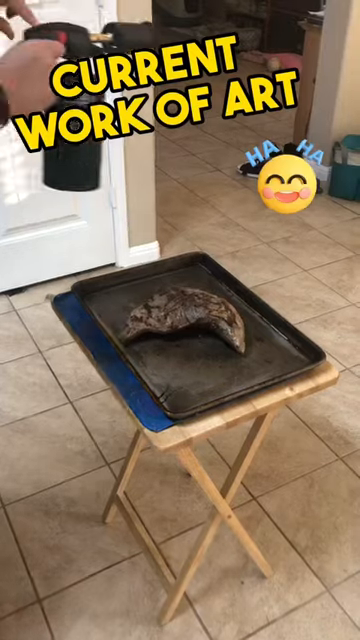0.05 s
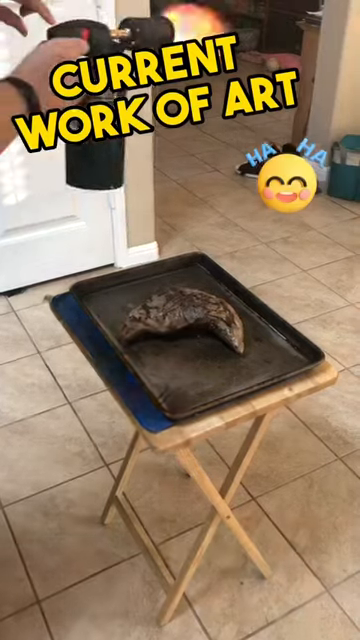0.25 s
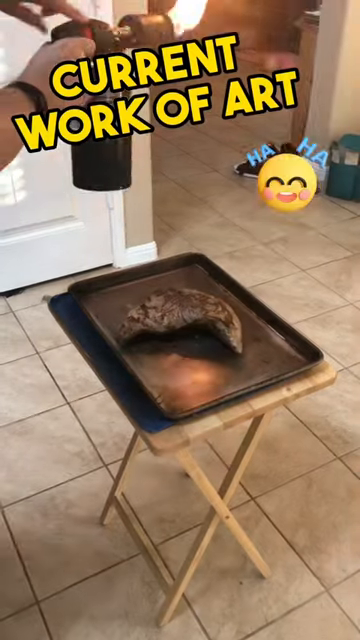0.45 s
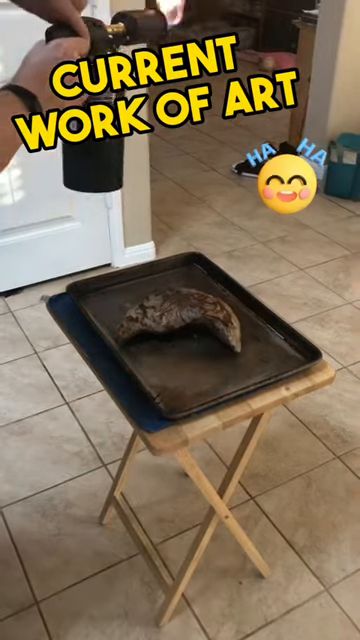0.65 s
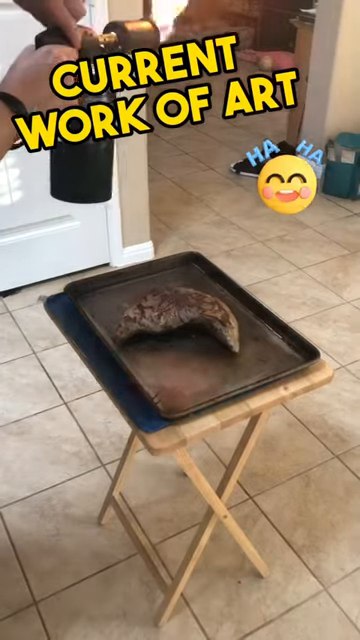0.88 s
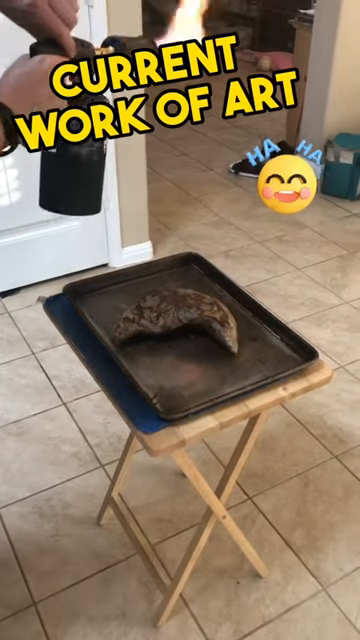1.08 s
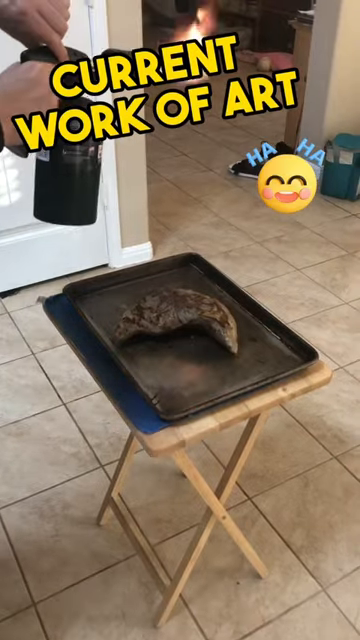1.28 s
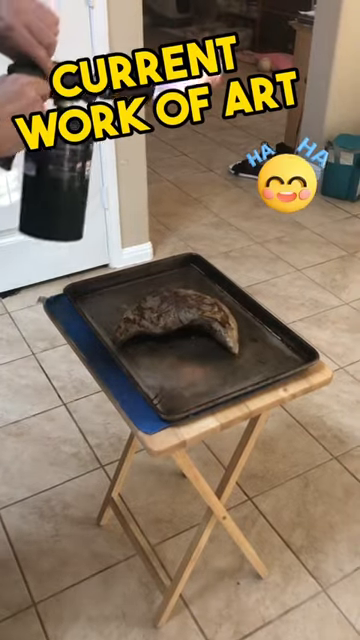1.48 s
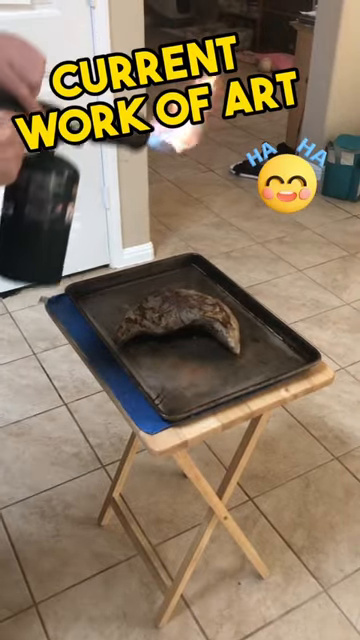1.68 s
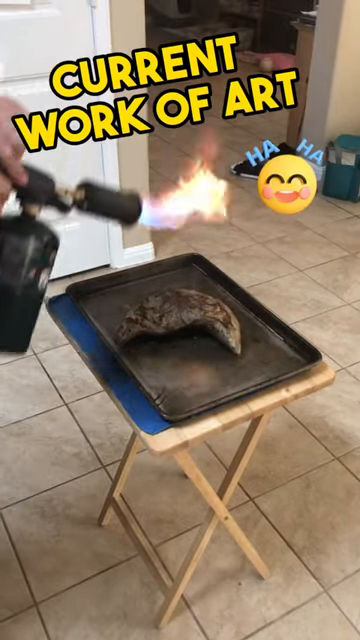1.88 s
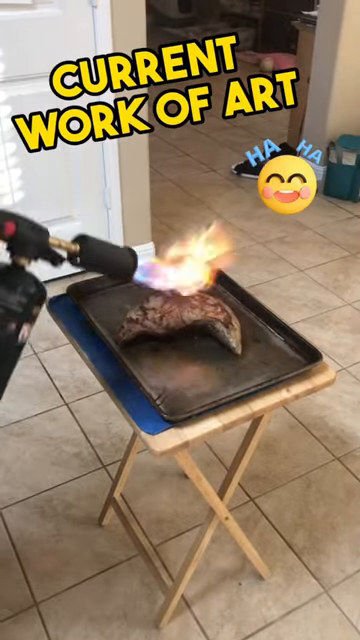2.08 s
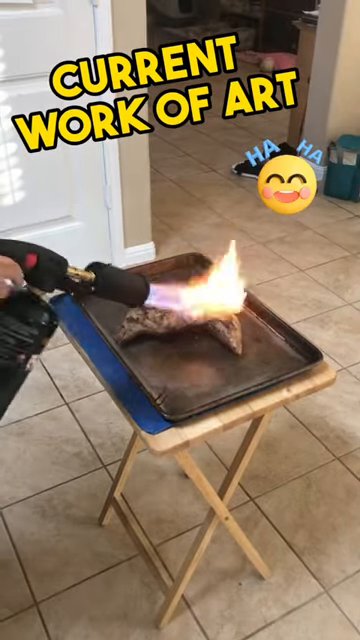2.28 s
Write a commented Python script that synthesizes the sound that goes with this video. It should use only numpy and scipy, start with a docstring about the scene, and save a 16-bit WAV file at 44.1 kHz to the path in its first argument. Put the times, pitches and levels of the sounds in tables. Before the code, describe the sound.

Gas torch hissing softly, popping alight and building to a fluttering roar in a room.

```python
"""A hand-held gas torch in a tiled room, heard in mono from one spot. Over quiet room tone, gas hisses
softly through the burner tube. The igniter snaps, and the gas catches with a deep pop that the room
throws back. A small flame idles; near one second the valve is opened: the jet hisses hard, the tube's
breathy note swells and the turbulent flame roars, higher and hollower as the torch swings down."""
import sys
import numpy as np
from scipy import signal
from scipy.fft import rfft, irfft, next_fast_len
from scipy.io import wavfile

SR = 44100
rng = np.random.default_rng(int(sys.argv[2]) if len(sys.argv) > 2 else 0)


def put_to_file(sound):
    """Save the sound as 16-bit audio at rate SR, in the file named by the first command-line argument."""
    columns = np.atleast_2d(sound).T  # one column per channel
    safe = np.clip(columns, -1, 1)
    whole_steps = np.round(safe * 32767)
    wavfile.write(sys.argv[1], SR, whole_steps.astype(np.int16))


N = 108045
T = np.arange(N) / SR
VALVE_OPEN_S = .92
FLUTTER_HZ = 68.5  # top rate of the turbulence in jet and flame


def amp(db):
    """Decibels to gain."""
    return 10 ** (np.asarray(db) / 20)


def unit(x):
    """Scales to rms 1."""
    return x / np.sqrt(np.mean(x ** 2) + 1e-20)


def curve(points):
    """A control curve at every sample."""
    return np.interp(T, *np.transpose(points))


def read(points, hz):
    """Reads a table on a log-frequency axis."""
    f, value = np.transpose(points)
    return np.interp(np.log(hz + 1), np.log(f + 1), value)


def noise(spectrum, peaks=()):
    """Noise at rms 1 with a broad colour and resonances on top."""
    size = next_fast_len(N, True)
    hz = np.fft.rfftfreq(size, 1 / SR)
    power = amp(read(spectrum, hz)) ** 2
    for centre, width, db in peaks:
        power += amp(db) ** 2 / (1 + 2 * ((hz - centre) / width) ** 2) ** 2
    return unit(irfft(rfft(rng.standard_normal(size)) * np.sqrt(power), size)[:N])


def narrow(hz, half_width_hz):
    """Noise in one resonance, steady or moving."""
    band = 1 / (1 + (np.fft.fftfreq(N, 1 / SR) / half_width_hz) ** 4)
    swirl = np.fft.ifft(band * (rng.standard_normal(N) + 1j * rng.standard_normal(N)))
    phase = 2 * np.pi * np.cumsum(hz * np.ones(N)) / SR
    return unit((swirl * np.exp(1j * phase)).real)


def flutter(depth_db):
    """Turbulence: a random swing of level in dB, with the given rms depth."""
    hz = np.fft.rfftfreq(2 * N, 1 / SR)
    band = hz / (hz + 10) / (1 + (hz / FLUTTER_HZ) ** 2)
    return depth_db * unit(irfft(rfft(rng.standard_normal(2 * N)) * band)[:N])


def blend(a, b, start_s, length_s):
    """Passes from one noise to another at constant power."""
    share = np.clip((T - start_s) / length_s, 0, 1)
    return a * np.sqrt(1 - share) + b * np.sqrt(share)


def burst(start_s, rise_s, hold_s, t60_s):
    """Envelope: rise, hold, decay."""
    t = T - start_s
    return np.clip(t / rise_s, 0, 1) * np.exp(-np.log(1000) * np.maximum(t - hold_s, 0) / t60_s)


def room(x):
    """Dense reflections off the tiles, each band dying at its own speed; little bass returns."""
    # reverberation of the room (frequency [Hz], t60 [s])
    decay_times = [(100, 0.77), (300, 0.71), (1000, 0.86), (2200, 0.77), (3600, 0.73), (6000, 0.64),
                   (11000, 0.5), (16000, 0.27)]
    hz, t, bands = signal.stft(rng.standard_normal(SR), SR, nperseg=256)
    bands = bands * np.exp(-np.log(1000) * t / read(decay_times, hz)[:, None])
    tail = signal.istft(bands, SR)[1][:SR]
    tail *= np.arange(SR) / SR > .004  # reaches the microphone 4 ms after the direct sound
    tail = signal.lfilter(*signal.butter(1, 232, "highpass", fs=SR), tail)
    return signal.fftconvolve(x, tail / np.linalg.norm(tail))[:N]


def room_tone():
    """The quiet air of the room, steady under everything."""
    # colour of the air (frequency [Hz], relative level [dB])
    air = [(25, -14), (55, 5), (95, -5), (140, 10.5), (200, -21), (280, 1), (400, -7), (700, -11.5),
           (900, -3.5), (1500, -11), (4000, -29)]
    return amp(-60.5) * noise(air)


def jet():
    """Gas hisses through the burner tube, whose resonances shift as the valve opens and the nozzle turns."""
    # hiss with the valve nearly shut, with a bright band near 13.3 kHz above it, and wide open (frequency [Hz],
    # relative level [dB])
    soft_hiss = [(300, -40), (1500, -15), (2200, -11), (4000, -14), (6000, -12), (9800, -22), (11500, -27),
                 (13300, -3), (15000, -13), (16000, -32)]
    full_hiss = [(300, -0.5), (1500, -3.5), (2100, -8), (3000, -9), (4300, -14.5), (5600, -4.5),
                 (8000, -5.5), (9600, -9), (11500, -12), (13500, -11.5), (16000, -19)]
    # tube resonances at low and full flow (frequency [Hz], width [Hz], relative level [dB])
    soft_tube = [(6730, 690, -5.5), (8250, 280, 0.5), (8750, 490, 1), (10480, 260, 2), (10950, 280, 2.5),
                 (12400, 500, -0.5)]
    full_tube = [(2570, 240, -7), (5040, 390, -4.5), (9000, 380, -7), (10400, 360, -7), (12500, 600, -8),
                 (14350, 300, -17)]
    # two bright resonances (frequency [Hz], half width [Hz], level against hiss [dB], tilt share [ratio])
    whistles = [(8680, 340, -7.5, 1), (10560, 390, -6, -0.53)]
    # they trade strength as the nozzle turns (time [s], tilt toward the lower one [dB])
    tilt = [(1.0, 5), (1.2, 1.5), (1.39, 3), (1.55, 0.5), (1.77, -5), (1.95, 0.5), (2.13, -1), (2.34, -2.5),
            (2.45, 3)]
    # hiss of the gas flow (time [s], level [dB])
    flow = [(0, -48), (.2, -51.5), (.6, -51.5), (.88, -55), (.93, -48.5), (1.0, -47), (1.15, -44),
            (1.35, -39.5), (1.55, -40), (1.8, -39), (1.95, -38.5), (2.45, -37.5)]
    full = noise(full_hiss, full_tube)
    for hz, half_width, db, share in whistles:
        full += amp(db + share * curve(tilt)) * narrow(hz, half_width)
    hiss = blend(noise(soft_hiss, soft_tube), full, VALVE_OPEN_S, length_s=.15)
    return hiss * amp(curve(flow) + flutter(depth_db=1))


def tube_note():
    """The burner tube sounds a breathy octave that swells and sharpens with the flow."""
    # swell of the note (time [s], level [dB])
    swell = [(0, -62), (.2, -65), (.6, -63.5), (.85, -64.5), (.95, -55.5), (1.06, -52), (1.35, -52),
             (1.75, -54), (2.15, -53.5), (2.45, -53.5)]
    # partials at low flow (frequency [Hz], half width [Hz], relative level [dB])
    partials = [(2485, 78, -3), (4887, 140, 0)]
    sharpen = 1 + .022 * np.clip((T - VALVE_OPEN_S) / .4, 0, 1)
    note = sum(amp(db) * narrow(hz * sharpen, half_width) for hz, half_width, db in partials)
    return amp(curve(swell)) * note


def igniter():
    """The spring hammer snaps and rings briefly; floor and door answer first, then the room."""
    # colour of the snap (frequency [Hz], relative level [dB])
    spectrum = [(200, -51.5), (650, -30), (950, -9), (1400, -15), (2000, -7), (3200, -4), (4200, -3.5),
                (5500, -8), (10000, -13.5), (12500, -13), (14500, -9.5), (16500, -7)]
    # modes of the igniter (frequency [Hz], level [dB], t60 [s])
    modes = [(2010, -28, 0.017), (4200, -15, .005)]
    # first reflections at the microphone (delay [s], level against the snap [dB])
    echoes = [(.0024, -18), (.0052, -34), (.0066, -32), (.0138, -20), (0.0166, -12.5)]
    start_s, rise_s, hold_s = .2378, .000096, .00045
    rattle = rfft(rng.standard_normal(N) * burst(start_s, rise_s, hold_s, t60_s=.0053))
    whitened = rattle / (abs(rattle) + 1e-12)
    colour = amp(read(spectrum, np.fft.rfftfreq(N, 1 / SR)))
    onset = np.clip((T - start_s) / rise_s + 1, 0, 1)
    snap = amp(-44.5) * unit(irfft(whitened * colour, N) * onset)
    ring = sum(amp(db) * burst(start_s, rise_s, hold_s, t60) * np.sin(2 * np.pi * hz * (T - start_s))
               for hz, db, t60 in modes)
    early = sum(amp(db) * np.interp(T - round(delay * SR) / SR, T, snap) for delay, db in echoes)
    low_cut = signal.butter(4, 740, "highpass", fs=SR, output="sos")
    return signal.sosfilt(low_cut, snap + ring + early + amp(.5) * room(snap))


def pop():
    """The gathered gas catches at once: a low boom, a short puff, and a flare as the surplus burns off."""
    # low modes of burner and room (frequency [Hz], relative level [dB], t60 [s])
    modes = [(48.5, -17.5, 0.55), (83.5, -13, 0.28), (138.6, -1.5, 0.28), (157.7, -8.5, 0.15),
             (194.3, -10.5, 0.33), (219.6, -2.5, 0.17), (269.7, -21, 0.58)]
    # burning gas in the puff and in the low flare (frequency [Hz], relative level [dB])
    puff_colour = [(40, -12), (130, -7), (230, 2), (330, -15.5), (440, -8), (580, -3), (720, -13.5),
                   (850, -14.5), (1500, -17), (2300, -31.5), (4000, -25), (9000, -27.5), (16000, -41)]
    flare_colour = [(60, -15), (120, -6), (180, -0.5), (240, 1), (285, -10), (340, -18), (1000, -44)]
    start_s, rise_s, boom_db = .2615, .0066, -7.5
    t = np.maximum(T - start_s, 0)
    boom = sum(amp(boom_db + db) * burst(start_s, rise_s, rise_s, t60) * -np.sin(2 * np.pi * hz * t)
               for hz, db, t60 in modes)
    puff = amp(-24.5) * noise(puff_colour) * burst(start_s, rise_s=.0026, hold_s=.027, t60_s=.11)
    flare = amp(-30) * noise(flare_colour) * burst(start_s, rise_s, hold_s=.11, t60_s=.11)
    return boom + puff + flare + amp(-3.5) * room(puff)


def flame():
    """The turbulent flame: a faint rush when idle, a fluttering roar with surging bass at full flow."""
    # roar with the torch held high and swung down (frequency [Hz], relative level [dB])
    held_high = [(25, -43), (48, -9.5), (95, -39.5), (135, 5.5), (185, -8), (220, 2), (265, -11.5),
                 (350, -10), (420, -11.5), (520, -13), (720, -15), (830, -13.5), (1000, -17), (1320, -13.5),
                 (1550, -27), (2400, -32), (6000, -37)]  # bumps near 135 and 220 Hz boom like the pop
    swung_down = [(25, -32), (48, -16), (95, -12.5), (140, 4.5), (185, -10.5), (230, 2), (315, -6),
                  (355, -14.5), (425, 1), (520, -12.5), (720, -10), (1000, -13.5), (1260, -5.5),
                  (1550, -22), (2400, -27), (6000, -37)]
    # strength of the flame (time [s], level [dB])
    strength = [(0, -60.5), (.2, -75), (.55, -52.5), (.8, -63.5), (.91, -58), (.97, -41), (1.03, -36),
                (1.12, -36), (1.24, -32), (1.32, -33), (1.55, -31.5), (1.78, -29), (1.83, -28.5),
                (1.89, -31), (2.04, -33.5), (2.11, -33), (2.2, -33.5), (2.45, -34.5)]
    # surges of the bass (time [s], level against the rest of the roar [dB])
    surges = [(.95, 0.5), (1.03, 3.5), (1.09, -2.5), (1.2, 2), (1.235, -11), (1.27, 3), (1.4, 1),
              (1.55, -4), (1.68, 1), (1.74, -1), (1.82, 4), (1.94, -6.5), (2.03, 5), (2.12, -3),
              (2.17, 1.5), (2.45, 1.5)]
    roar = blend(noise(held_high), noise(swung_down), start_s=1.736, length_s=.3)
    bass = signal.sosfiltfilt(signal.butter(4, 370, fs=SR, output="sos"), roar)
    surging = roar - bass + bass * amp(curve(surges))
    return surging * amp(curve(strength) + flutter(depth_db=1.52))


def hollow_note():
    """A narrow band of the roar that climbs and sinks as the flame nears a tray."""
    # path of the note as the torch swings down (time [s], centre [Hz], level [dB])
    path = [(1.449, 244.2, -42), (1.701, 260, -45), (1.83, 274.5, -38.5), (1.948, 311.7, -37),
            (2.06, 317.2, -33), (2.131, 302.9, -45), (2.191, 379.7, -38), (2.281, 287.4, -40),
            (2.45, 270, -36)]
    times, hz, db = np.transpose(path)
    note = narrow(np.interp(T, times, hz), half_width_hz=54)
    return note * amp(np.interp(T, times, db)) * (T > times[0])


def scene():
    """Torch and room at one microphone, the same on both channels."""
    direct = jet() + tube_note() + flame()
    wet = amp(-4)  # reflections against the direct sound
    torch = (direct + wet * room(direct)) / np.hypot(1, wet)
    mono = torch + hollow_note() + igniter() + pop() + room_tone()
    return np.array([mono, mono])


def record(dry):
    """The recorder's low cut and band limit."""
    low_cut_hz, top_hz = 51, 15900
    thinned = signal.sosfilt(signal.butter(4, low_cut_hz, "highpass", fs=SR, output="sos"), dry)
    taps = signal.firwin(511, top_hz, window=("kaiser", 9), fs=SR)
    return signal.oaconvolve(thinned, taps[None], "same")


dry = scene()
out = record(dry)
put_to_file(out)
```